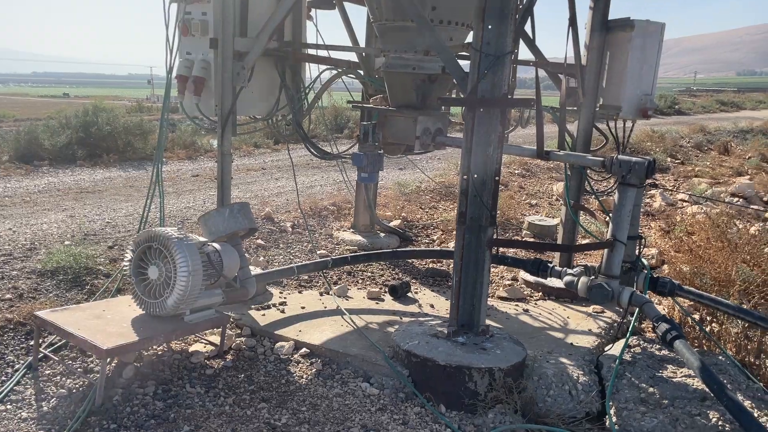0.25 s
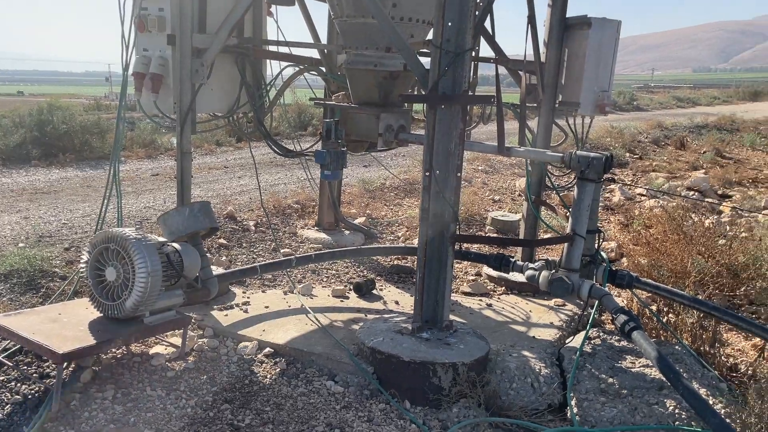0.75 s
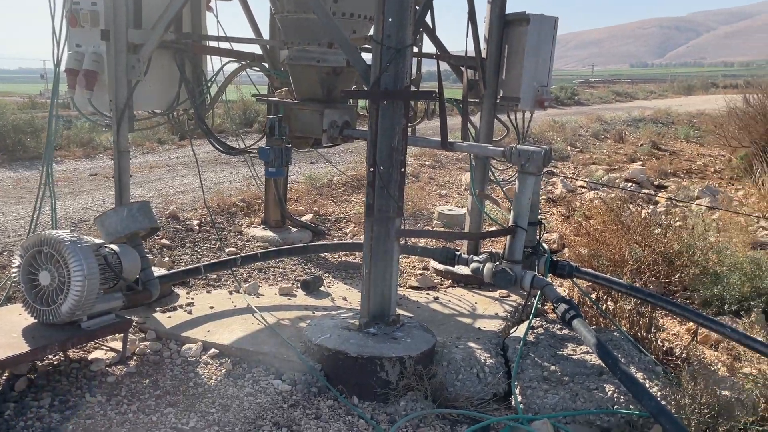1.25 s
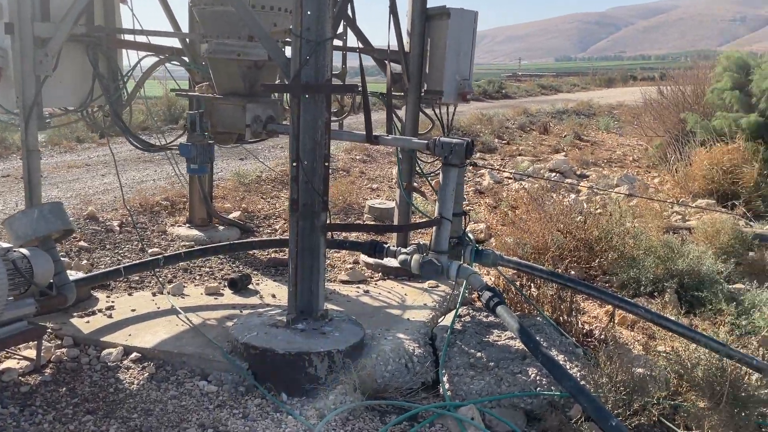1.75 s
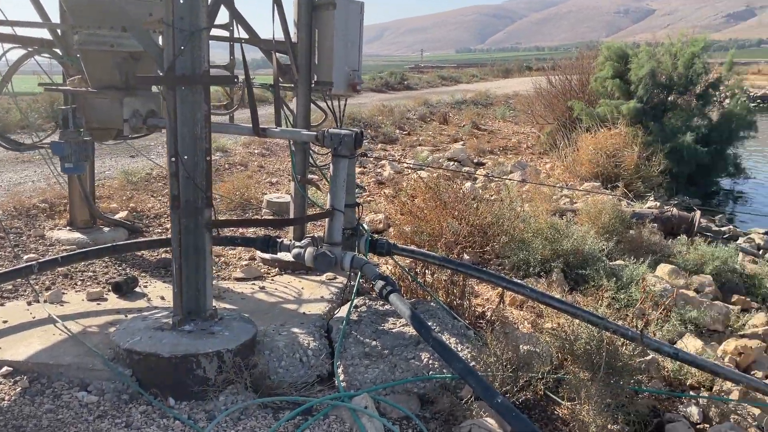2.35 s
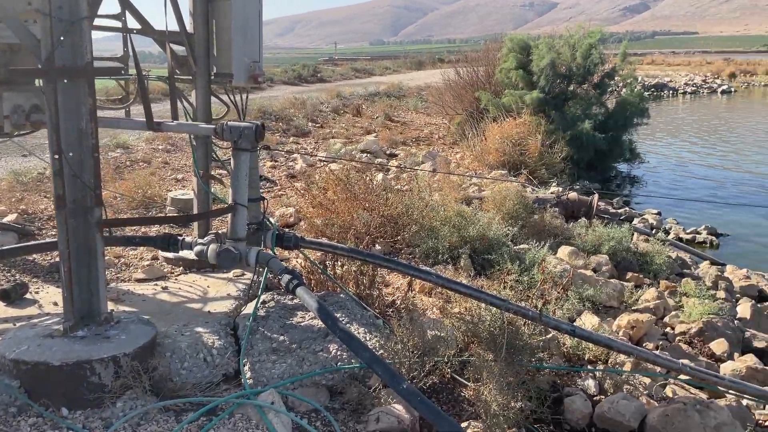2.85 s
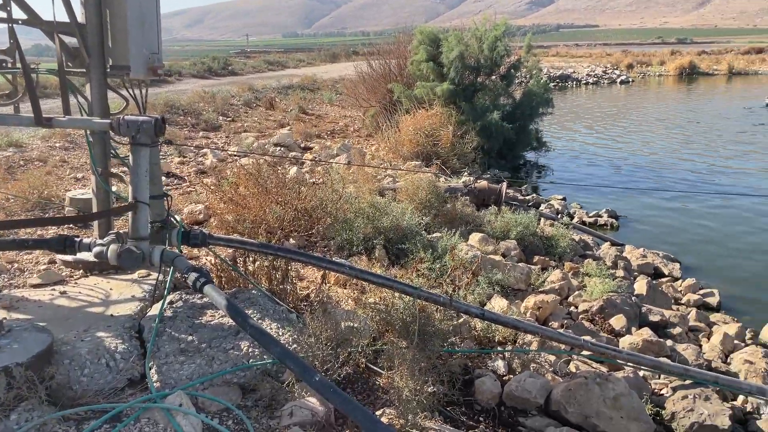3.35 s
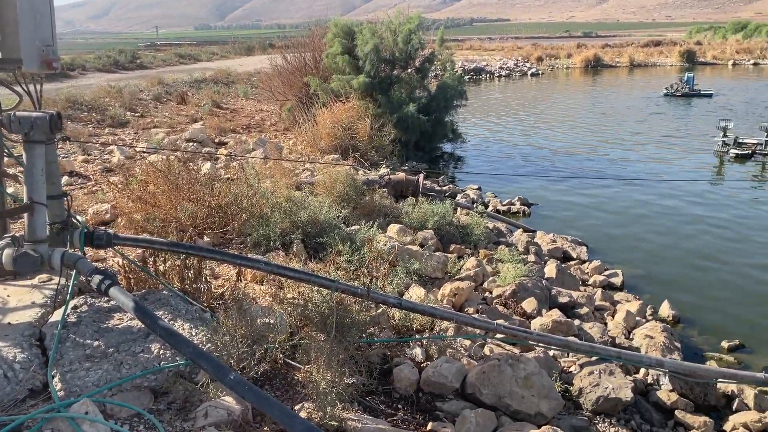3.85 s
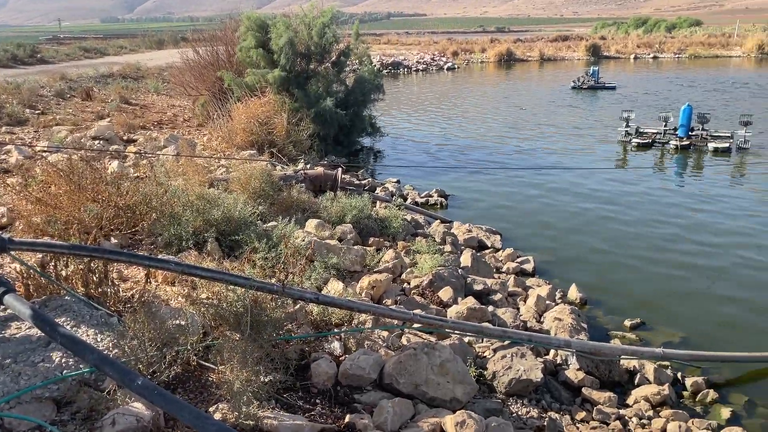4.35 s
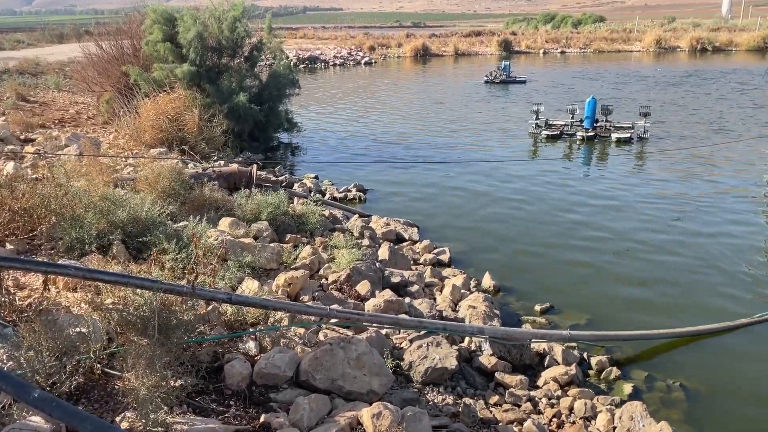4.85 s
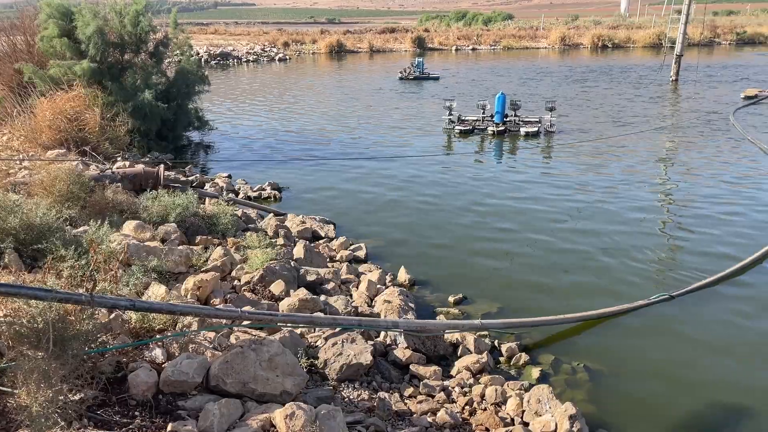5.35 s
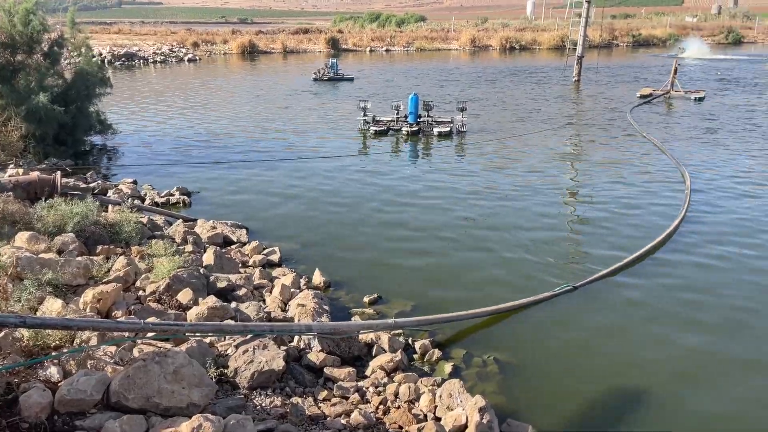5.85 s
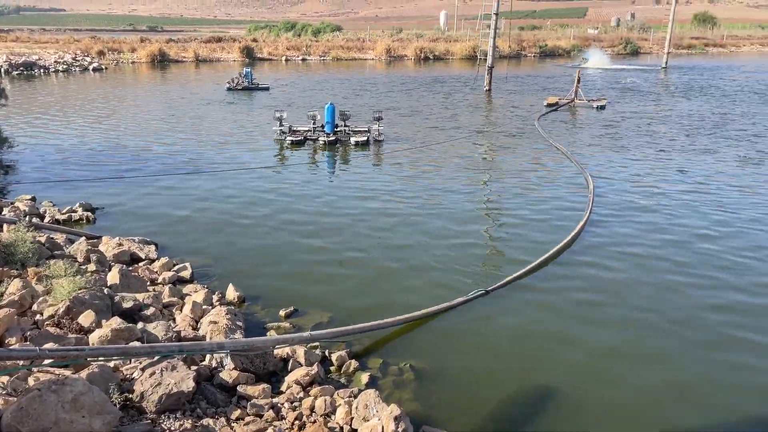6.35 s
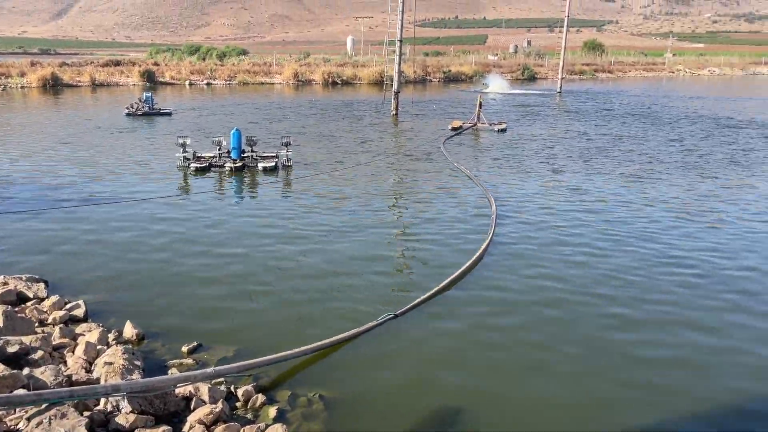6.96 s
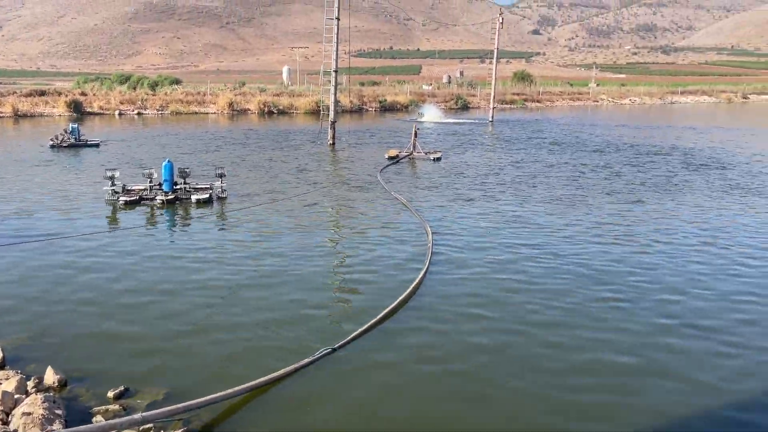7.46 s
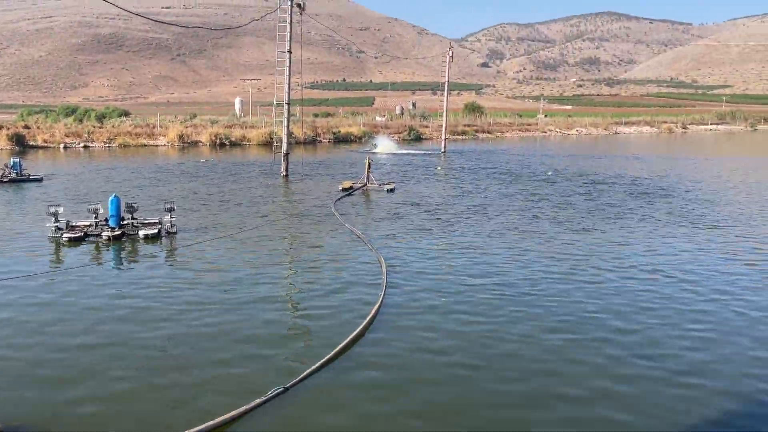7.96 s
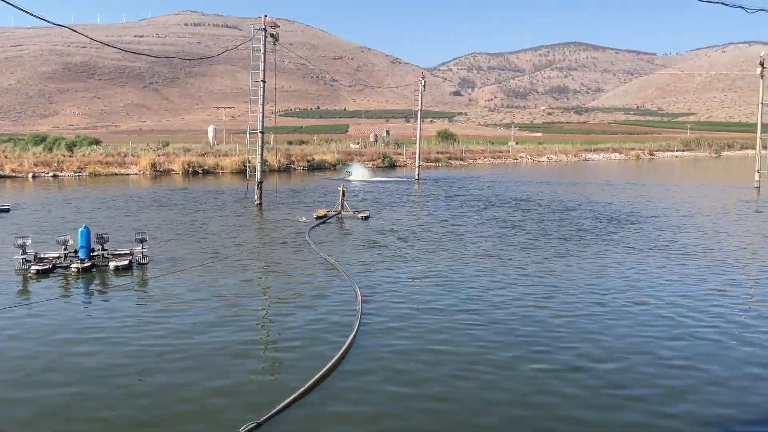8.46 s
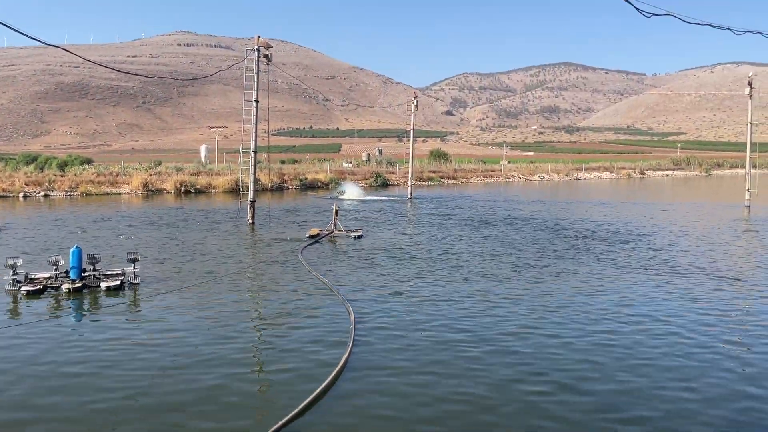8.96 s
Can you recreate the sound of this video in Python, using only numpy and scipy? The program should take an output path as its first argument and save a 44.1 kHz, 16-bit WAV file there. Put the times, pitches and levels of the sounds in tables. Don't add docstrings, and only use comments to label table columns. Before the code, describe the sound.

Close by, an electric air blower beside a pond runs without a break: a hollow, boomy air roar with broad hiss and a faint motor whine. A thin whistling edge swells midway. As the handheld stereo microphone turns right, the roar drifts left and its colour changes. Low wind gusts rumble throughout, with the heaviest thumps around the middle and again later.

```python
import sys
import numpy as np
from scipy import signal
from scipy.io import wavfile
from scipy.ndimage import uniform_filter1d, map_coordinates

SR = 44100
rng = np.random.default_rng(int(sys.argv[2]) if len(sys.argv) > 2 else 0)


def log_audio(samples):
    frames = np.atleast_2d(samples).T
    limited = np.clip(frames, -1, 1)
    pcm = np.round(limited * 32767).astype(np.int16)
    wavfile.write(sys.argv[1], SR, pcm)


def invert_db(level):
    return 10 ** (np.asarray(level, dtype=float) / 20)


N = 406161
TIME = np.arange(N) / SR
FRAME = 2048
HZ = np.fft.rfftfreq(FRAME, 1 / SR)[:, None]

# t/s, lead of the throat/ms, lead of the drum/ms
HEADING = [
    (0, -0.1, -0.11),
    (1.6, -0.029, 0.0),
    (2.4, 0.063, -0.0062),
    (4, 0.25, 0.2),
    (5.6, 0.36, 0.34),
    (7.2, 0.43, 0.57),
    (9.21, 0.45, 0.69),
]


def along(points, at):
    f, *cols = np.transpose(points)
    return [np.interp(np.log(at + 1), np.log(f + 1), c) for c in cols]


def curves(rows, t):
    s, *cols = np.transpose(rows)
    return [np.interp(t, s, c) for c in cols]


def wobble(rate):
    knots = rng.standard_normal(int(N * rate / SR) + 4)
    return map_coordinates(knots, [TIME * rate])


def field(shape, bins, frames):
    f = rng.standard_normal(shape)
    for _ in range(2):
        f = uniform_filter1d(f, bins, 0)
        f = uniform_filter1d(f, frames, 1)
    return f / f.std()


def above(hz, width_hz):
    return 1 / (1 + np.exp(np.clip((hz - HZ) / width_hz, -30, 30)))


def port_pair(gain_db, alike, lead, patchy_db):
    overlap = FRAME * 3 // 4
    _, t, (a, b) = signal.stft(rng.standard_normal((2, N)), SR, nperseg=FRAME, noverlap=overlap)
    mix = np.arccos(np.clip(alike, 0, 1)) / 2
    shared = np.cos(mix) * a
    own = np.sin(mix) * b
    turn = np.exp(.5j * lead(t))
    pair = np.array([(shared + own) * turn, (shared - own) * turn.conj()])
    patches_db = patchy_db * field(a.shape, bins=16, frames=5)
    gain = invert_db(gain_db(t) + patches_db) * np.sqrt(SR / 2)
    return signal.istft(pair * gain, SR, nperseg=FRAME, noverlap=overlap)[1][:, :N]


def gusts():
    # start t/s, hold/s, buffet level/dB
    squalls = [(0.0, 0.1, -33), (0.287, 0.05, -32.5), (0.49, 0.092, -30.5), (0.847, 0.06, -31),
               (1.24, 0.39, -33), (1.816, 0.37, -30.5), (2.337, 0.42, -33.5), (2.88, 0.05, -28),
               (3.048, 0.13, -28.5), (3.3, 0.38, -30.5), (3.82, 0.27, -30), (4.22, 0.37, -31),
               (4.496, 0.33, -26.5), (4.947, 0.12, -30.5), (5.14, 0.15, -21.5), (5.35, 0.06, -25),
               (5.548, 0.06, -22), (5.68, 0.28, -31), (6.146, 0.13, -34), (6.533, 0.12, -36.5),
               (6.786, 0.035, -33.5), (6.943, 0.15, -31.5), (7.28, 0.22, -27), (7.6, 0.05, -26),
               (7.71, 0.16, -27), (8.24, 0.03, -33), (8.52, 0.057, -34), (9.0, 0.14, -31)]
    calm_db, rise_s, fall_s = -42, 0.044, 0.039
    power = invert_db(2 * calm_db)
    for start, hold, db in squalls:
        before = (start - TIME) / rise_s
        after = (TIME - start - hold) / fall_s
        edge = np.maximum(np.maximum(before, after), 0)
        power = power + invert_db(2 * db) * np.exp(-edge ** 2)
    eddies_db = 2 * wobble(9)
    return np.sqrt(power) * invert_db(eddies_db)


def buffeting():
    # f/Hz, level/dB per Hz
    buffet = [(15, -32), (46, -3.5), (70, -0.5), (123, -2), (200, -9), (300, -13), (500, -18), (900, -120)]
    rumble = port_pair(lambda t: along(buffet, HZ)[0] + 0 * t, 0.88, lambda t: .1 + 0 * t, patchy_db=-0.24)
    rumble = rumble * invert_db(1.06 * wobble(25))
    return gusts() * rumble / rumble.std()


def thumps():
    # t/s, peak level/dB, f/Hz
    hits = [(0.414, -18, 135), (0.875, -19, 104), (1.494, -17, 205), (1.598, -16, 148), (2.427, -18, 137),
            (2.907, -16, 75), (4.311, -14, 129), (4.52, -17, 113), (4.558, -12, 106), (4.635, -14, 110),
            (4.698, -17, 102), (4.738, -13, 106), (4.775, -11.5, 103), (4.895, -15, 105), (5.012, -11, 66),
            (5.145, -8.5, 74), (5.218, -10, 135), (5.256, -7, 121), (5.331, -15, 86), (5.374, -15, 108),
            (5.6, -18, 73), (6.973, -16, 209), (7.319, -9, 125), (7.35, -14, 148), (7.414, -17, 150),
            (7.435, -13, 115), (7.497, -13, 97), (7.629, -14, 95), (7.752, -17, 92), (7.885, -10, 127)]
    half = SR // 16
    t = np.arange(-half, half) / SR
    out = np.zeros((2, N + 2 * half))
    for (s, db, hz), (phase, pan) in zip(hits, rng.standard_normal((len(hits), 2))):
        swing = 2 * np.pi * hz * t + 2 * phase
        push = np.sin(swing) + .3 * np.sin(2.2 * swing)
        push = push * np.exp(-(t * hz / 0.66) ** 2)
        port_db = db - 4.0 + 1.3 * pan * np.array([[1], [-1]])
        out[:, round(s * SR):][:, :len(t)] += invert_db(port_db) * push
    return out[:, half:half + N]


def wind():
    return buffeting() + thumps()


def whine():
    orders = [16, 22, 23, 24, 25]
    # left level/dB, right level/dB
    orders_db = [(-54, -54), (-47.5, -48), (-51.5, -53), (-49, -51), (-55, -55)]
    # t/s, level/dB
    blades = [
        (0, -42.5),
        (2.5, -44.5),
        (4, -45),
        (5.5, -48),
        (7, -53),
        (9.21, -61),
    ]
    shaft_hz, blade_hz = 49.17, 2699.6

    def sway_db():
        return 1.5 * np.array([wobble(1.3), wobble(1.3)])

    lead_s = np.array([[.5], [-.5]]) * (curves(HEADING, TIME)[0] + 0.057) / 1000
    turns = shaft_hz * (TIME + lead_s) + .003 * wobble(3)
    tones = 0
    for order, db in zip(orders, orders_db):
        level = invert_db(np.reshape(db, (2, 1)) + sway_db())
        tones = tones + level * np.sin(2 * np.pi * (order * turns + rng.random()))
    blade_db = curves(blades, TIME)[0] - 3.2 + np.array([[1.2], [-1.2]]) + sway_db()
    blade_cycles = blade_hz * (TIME + lead_s) + .1 * wobble(4)
    blade = invert_db(blade_db) * np.sin(2 * np.pi * blade_cycles)
    return np.sqrt(2) * (tones + blade)


def whistle_power(t):
    # f/Hz, width/Hz, left over right level/dB
    tone = (5365, 120, 2.5)
    # t/s, peak level/dB, half width/s
    beams = [
        (2.0, -46, 0.3),
        (3.95, -39, 0.4),
        (6.55, -38.5, 0.55),
        (7.4, -38.5, 0.5),
        (8.5, -44, 0.9),
    ]
    hz, width_hz, pan_db = tone
    rest_db = -56
    peak_db = -20 * np.log10(1 + ((HZ - hz) / width_hz) ** 2) - 10 * np.log10(width_hz)
    lobes = sum(invert_db(2 * db) * np.exp(-((t - s) / half_s) ** 2) for s, db, half_s in beams)
    level_db = 10 * np.log10(invert_db(2 * rest_db) + lobes)
    port_db = np.array([pan_db, -pan_db])[:, None, None]
    return invert_db(2 * (peak_db + level_db - 2.5 + port_db))


def shaded(t):
    # f/Hz, then left and right level/dB facing, side-on, turned away
    casing_boom = [(123, 3.5, 4, 0, -8, -6, -8), (168, -2.5, -2.5, -3, -4.5, -5.5, -3.5),
                   (236, 2, 0.5, -1.5, -5, 0.5, -7), (286, 7.5, 7.5, 4.5, -3.5, 1, 0.5),
                   (340, 3, 0.5, 9, 8, 4, -5.2), (363, 2.2, 4.5, 4, 3.5, 6.5, 6),
                   (417, 2, 1.2, -0.5, -5, 0, -9), (508, -3, -0.5, 0.5, -1, -1.8, -1.5),
                   (566, 4.5, 5.5, 6, 2, 5, -4), (614, -4, -1.5, 1.5, 3, -3, -3.5),
                   (678, -12, -9, -10, -18, -9, -9)]
    outlet = [(756, -9, -13, -5, -9.3, -10.5, -24), (810, -10.5, -4.5, -4, -7, -6, -12),
              (870, -7, -5.5, -3.5, -5, -7, -7), (1025, -5.5, -5.5, -5, -13, -5.5, -8.5),
              (1144, -0.5, -25, -29, -22, -18.5, -10.5), (1237, -14, -3.5, -4, -7, -5, -4),
              (1347, -5, -1.5, -4, -3.5, -8.5, -5.5), (1447, -0.5, 0, -2, -6, -8, -3),
              (1548, -8, -6, -13.5, -8.5, -14, -7), (1770, -14, -13.5, -12, -8.5, -10, -7),
              (1750, -13, -9, -13, -19, -18, -14), (1893, -9.5, -8.5, -6, -3, -4.5, -7),
              (1990, -13, -13, -16, -26, -19, -9)]
    intake = [(2080, -15, -16, -14, -10.5, -11.5, -13.7), (2210, -15, -7, -16, -12.5, -15, -9),
              (2310, -19, -20, -11, -19, -14.3, -11), (2620, -12, -13, -15, -17, -13.5, -16),
              (2690, -10, -13.5, -9, -14, -12, -19), (3020, -10, -10, -9, -19, -10, -14),
              (3200, -12, -15, -13, -17, -14.5, -11.5), (3280, -7.5, -13.5, -13.5, -9, -10, -12.5),
              (3780, -15.5, -14, -8.5, -18, -12.5, -17.5), (4300, -12, -17, -12.5, -12, -12, -18),
              (4740, -10, -14.5, -7.5, -10, -9.5, -13.5), (5560, -9, -14.5, -11.5, -11.5, -13, -13.5),
              (5660, -11.5, -11, -9, -12.5, -11, -12), (6400, -11, -14, -12.5, -13, -13, -14)]
    jet = [(6670, -10, -12.5, -10, -14, -13, -13.5), (7350, -11, -11.5, -9, -8.5, -10.5, -10.5),
           (7800, -15.5, -14, -14, -14.5, -15, -18), (8700, -14, -13.5, -14, -20, -13.5, -13),
           (9900, -17, -17.5, -18, -15.5, -19, -18), (11000, -19.5, -19, -18, -17, -19.5, -20),
           (12300, -22.1, -23, -22, -21.1, -23, -22), (13500, -22.5, -20, -21, -21, -23, -22),
           (15000, -15, -19, -19, -18.2, -19.5, -19), (15600, -27, -25, -27, -25, -28, -27)]
    pose_ms = [-0.029, 0.25, 0.38]
    bottom = [(45, *[-22] * 6), (80, *[-9] * 6)]
    levels = along(bottom + casing_boom + outlet + intake + jet, HZ)
    poses = np.reshape(levels, (3, 2, -1, 1))
    throat_ms = curves(HEADING, t)[0]
    reference_db = -55
    return reference_db + sum(pose * np.interp(throat_ms, pose_ms, on) for pose, on in zip(poses, np.eye(3)))


def airflow():
    # t/s, level/dB
    flow_rows = [(0, -0.5), (0.6, -0.56), (1.6, -0.14), (2.2, 0.3), (2.8, 0.3), (3.4, 0.2), (4.2, 0),
                 (5.1, 0.5), (6.0, 1.3), (6.8, 0.6), (7.3, 0.1), (8.0, -0.5), (8.8, -1), (9.21, -0.3)]
    # f/Hz, width/Hz, level/dB facing, level/dB turned away
    ridges = [(351, 9, 1.5, 5), (406, 22, 0, -1.5), (782, 14, 8.5, 4), (1090, 42, -5.5, 1),
              (1260, 41, 3.5, 0), (1476, 21, 3.5, 2.5), (1590, 73, 3.5, -0.5)]
    # f/Hz, likeness 0-1
    likeness = [(60, 1), (200, 0.98), (400, 0.95), (900, 0.85), (1450, 0.91), (1700, 0.34), (1900, 0.61),
                (2100, 0.66), (2400, 0.53), (4000, 0.79), (5300, 0.38), (6500, 0.66), (8000, 0.98),
                (15000, 1)]
    # f/Hz, left lead/radians facing, left lead/radians turned away
    port_phase = [(2000, 0.98, -0.99), (2790, -0.78, 1.75), (3560, -0.5, 1.9), (4180, -0.44, -0.094),
                  (5060, 1, 1.1), (5830, -0.22, -0.51)]
    throat, hiss, treble = above(645, 30), above(1980, 17), above(5700, 200)
    fine = above(6620, 290)

    def gain_db(t):
        hiss_db, = curves(flow_rows, t)
        drum_db = 1.24 * hiss_db
        throat_db = -0.2 + 0.82 * hiss_db
        flow = shaded(t) + drum_db * (1 - throat) + throat_db * (throat - hiss) + hiss_db * hiss
        turned = np.clip(curves(HEADING, t)[0] / 0.28, 0, 1)
        for hz, width_hz, facing_db, away_db in ridges:
            ridge_db = facing_db + (away_db - facing_db) * turned
            flow = flow + ridge_db / (1 + ((HZ - hz) / width_hz) ** 2)
        flow = flow + 0.33 * treble * np.interp(t, TIME, wobble(40))
        return 10 * np.log10(invert_db(2 * flow) + whistle_power(t))

    def lead(t):
        throat_ms, drum_ms = curves(HEADING, t)
        outlet_ms = throat_ms * (0.9 + 0.17 * above(1350, 40))
        path = 2 * np.pi * HZ / 1000 * (drum_ms + (outlet_ms - drum_ms) * throat)
        facing, away = along(port_phase, HZ)
        ports = facing + (away - facing) * np.clip(drum_ms / 0.63, 0, 1)
        drift = .4 * (1 - treble) * field((len(HZ), len(t)), bins=20, frames=70)
        spaced = -np.pi - 2 * np.pi * (HZ - 8220) / 6830
        return path * (1 - hiss) + (ports + drift) * (hiss - fine) + spaced * fine

    return port_pair(gain_db, along(likeness, HZ)[0], lead, patchy_db=0.75)


def scene():
    return wind() + whine() + airflow()


def roll_off(x):
    return signal.sosfilt(signal.butter(12, 15660, fs=SR, output="sos"), x)


def record(dry):
    cut = signal.butter(3, 36, "high", fs=SR, output="sos")
    x = signal.sosfilt(cut, dry)
    x = x / (1 + np.abs(x / .58) ** 4) ** (1 / 4)
    return roll_off(x)


dry = scene()
out = record(dry)
log_audio(out)
```